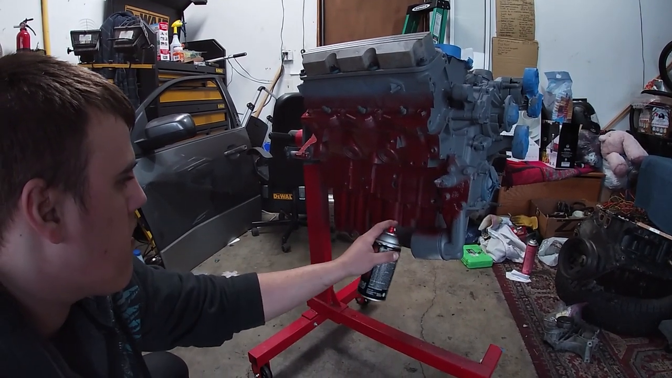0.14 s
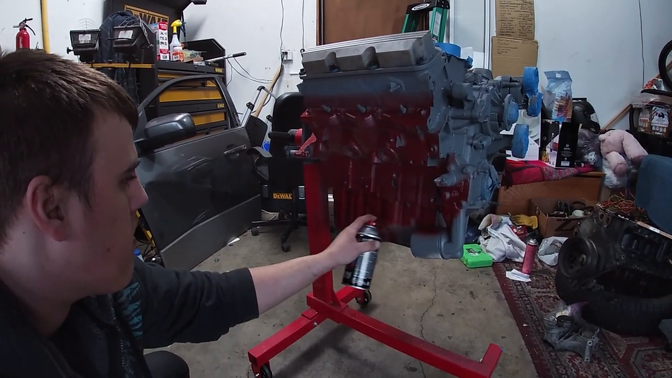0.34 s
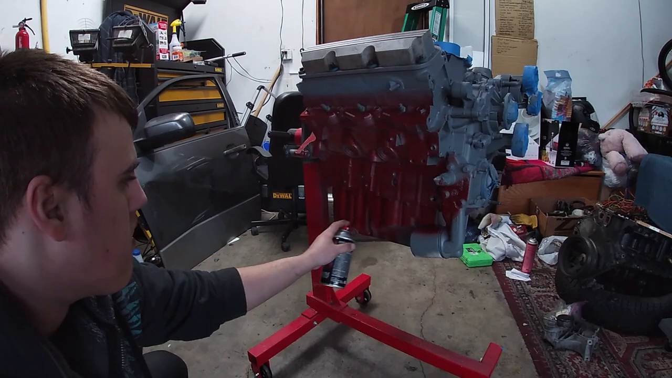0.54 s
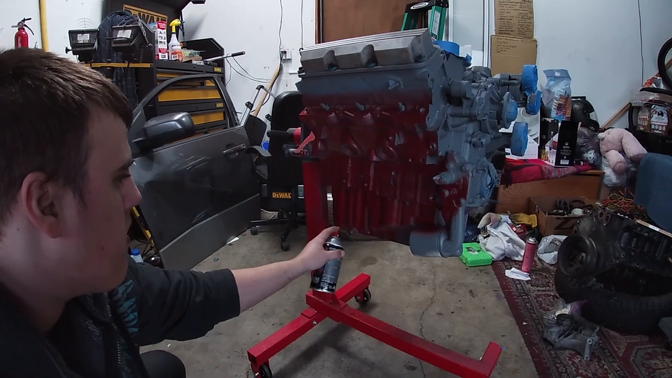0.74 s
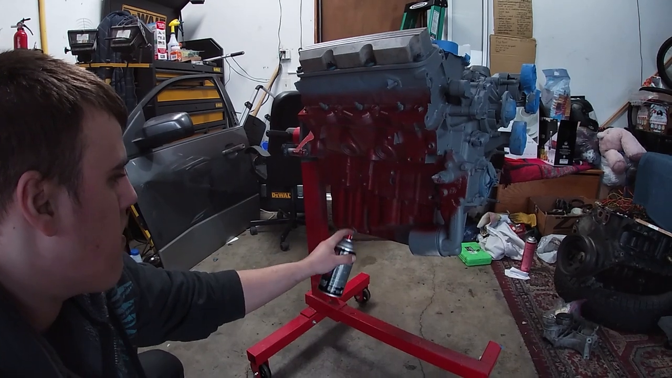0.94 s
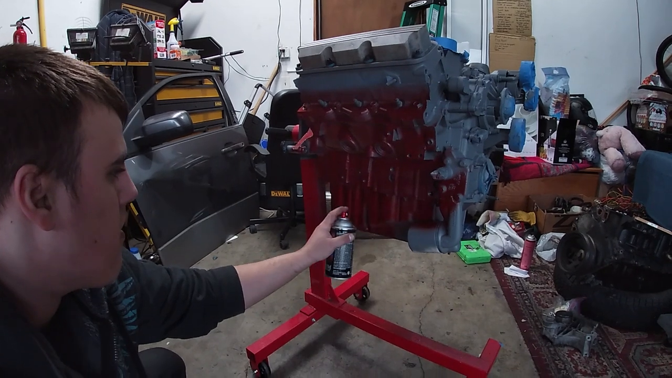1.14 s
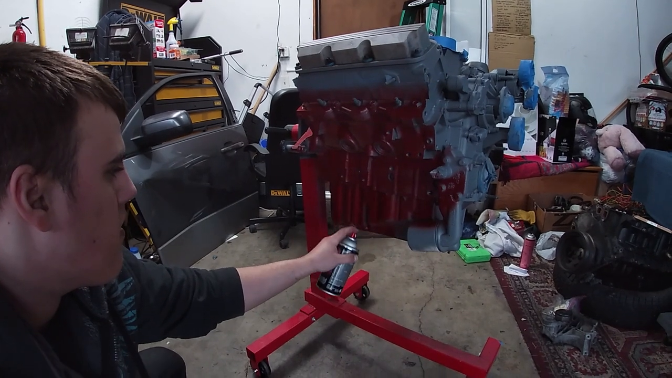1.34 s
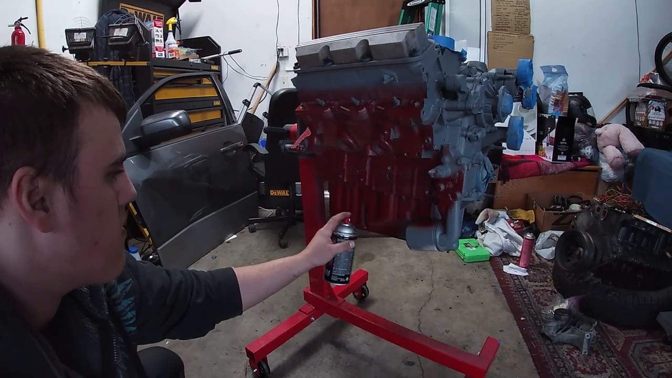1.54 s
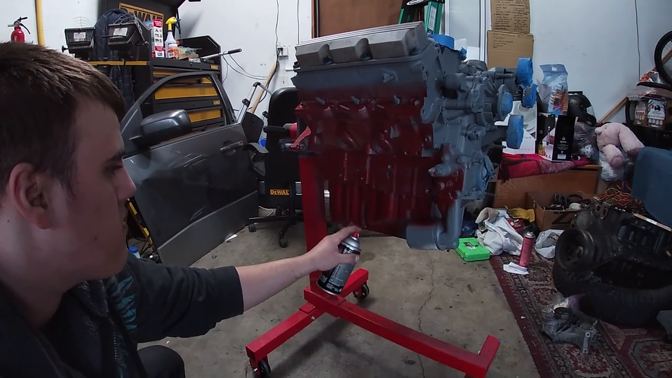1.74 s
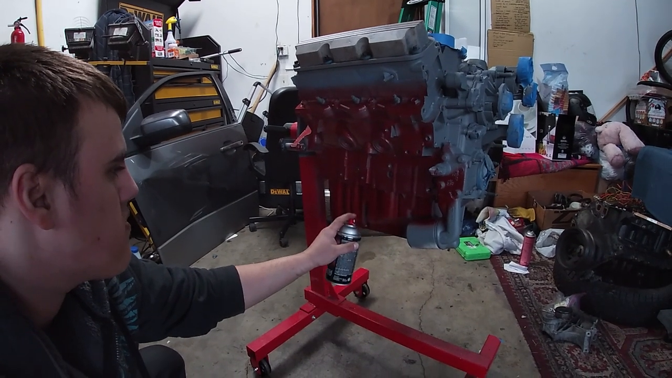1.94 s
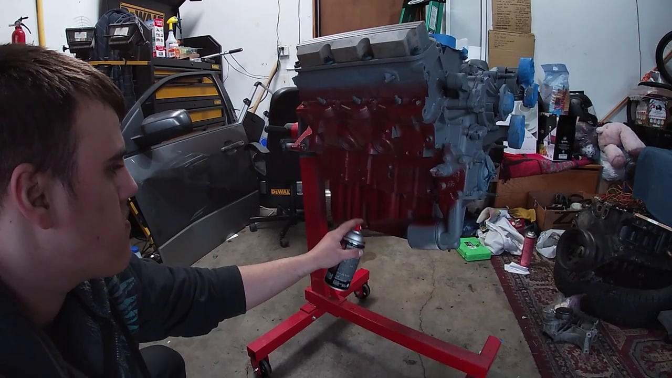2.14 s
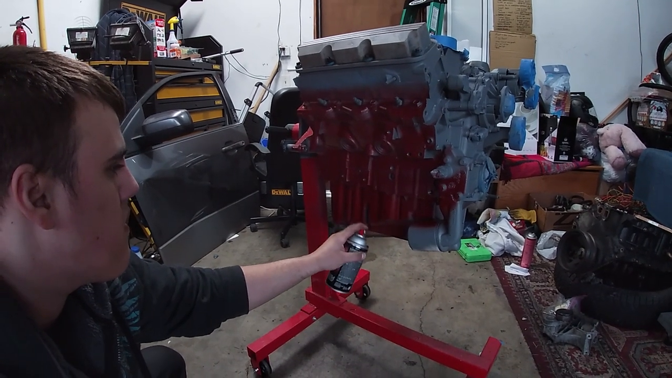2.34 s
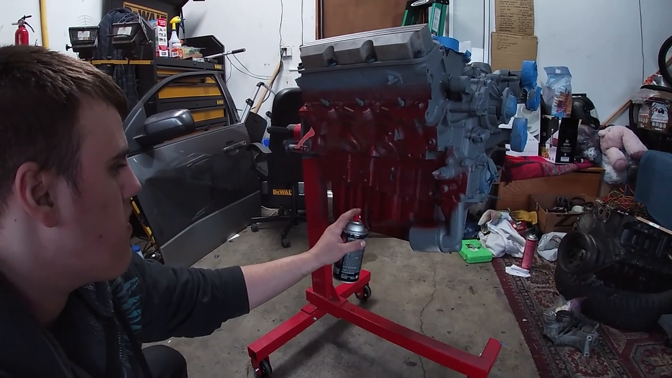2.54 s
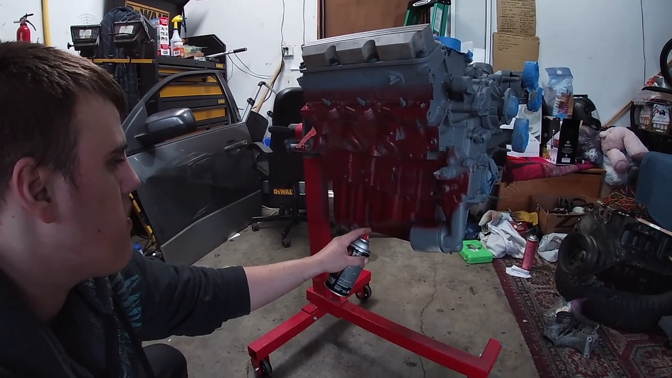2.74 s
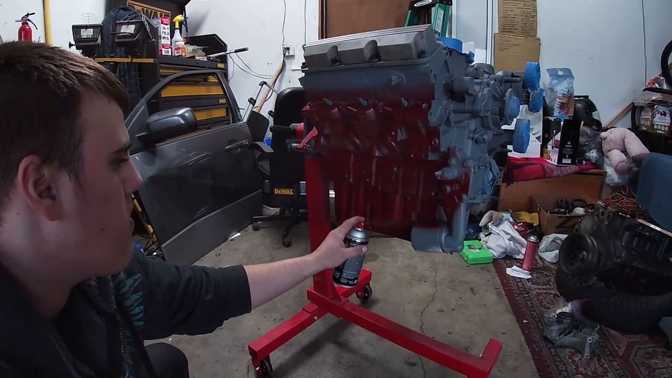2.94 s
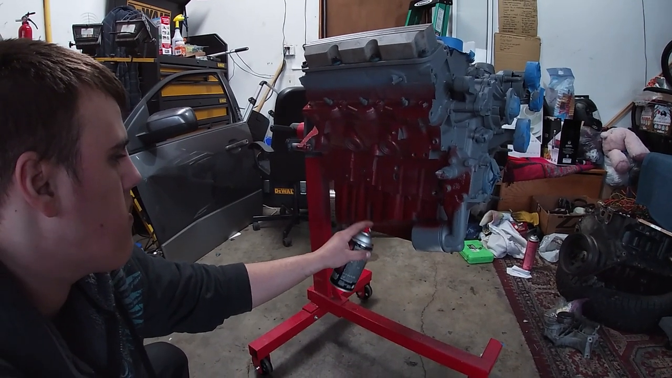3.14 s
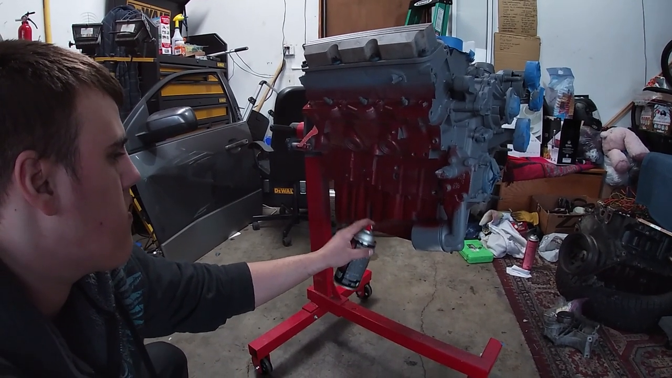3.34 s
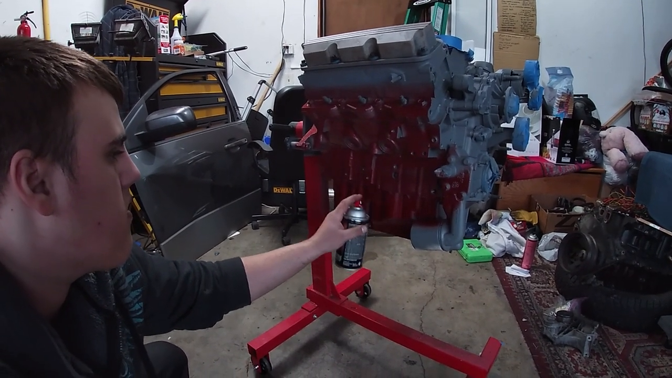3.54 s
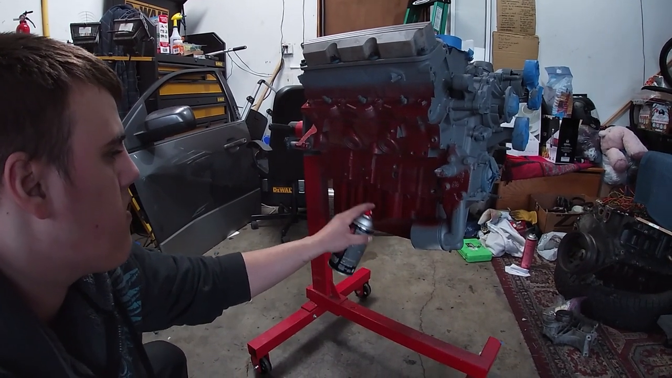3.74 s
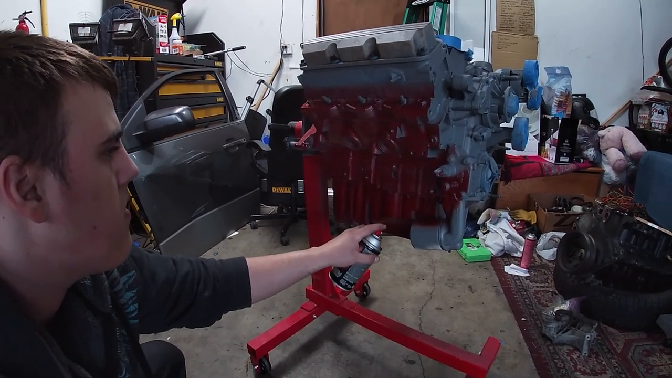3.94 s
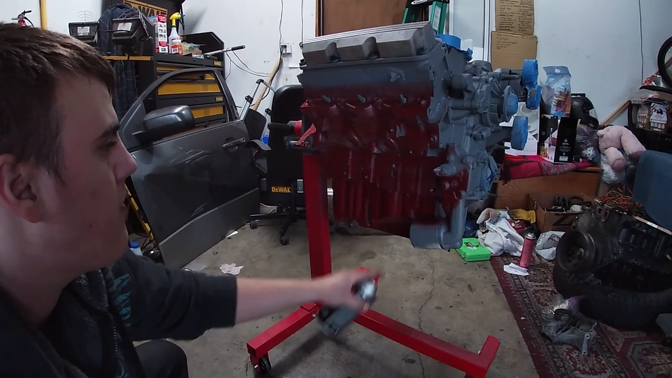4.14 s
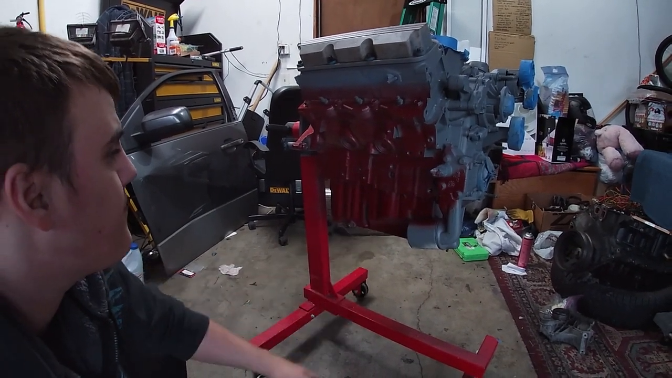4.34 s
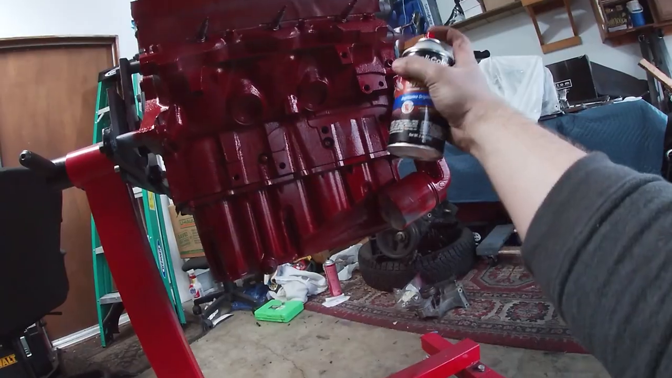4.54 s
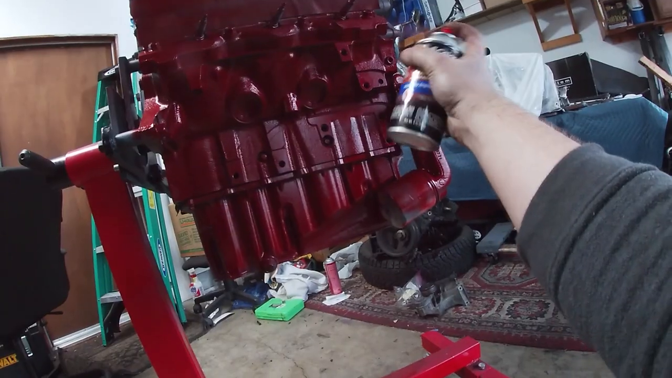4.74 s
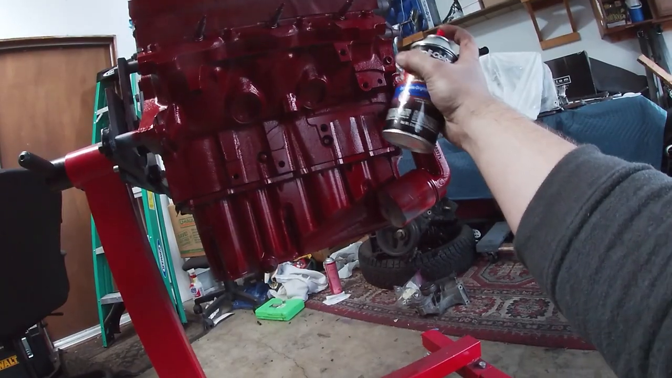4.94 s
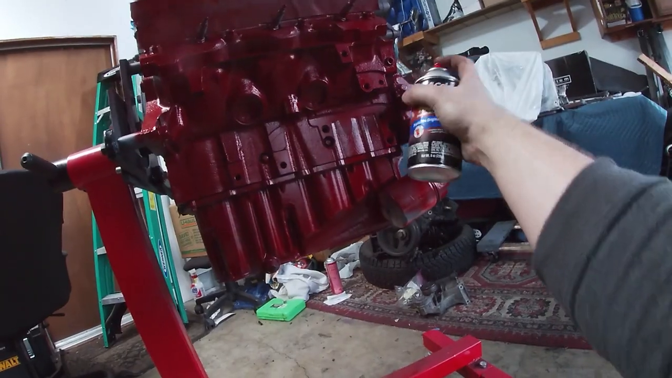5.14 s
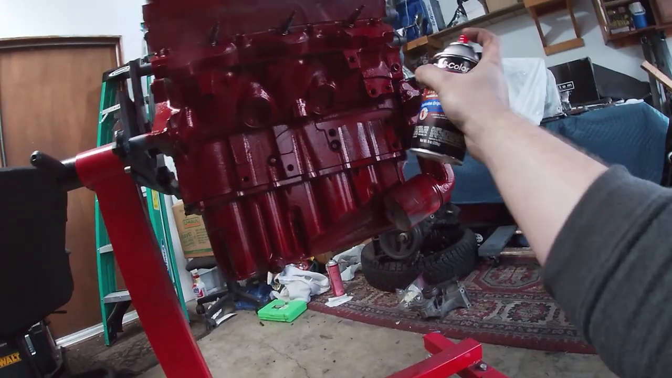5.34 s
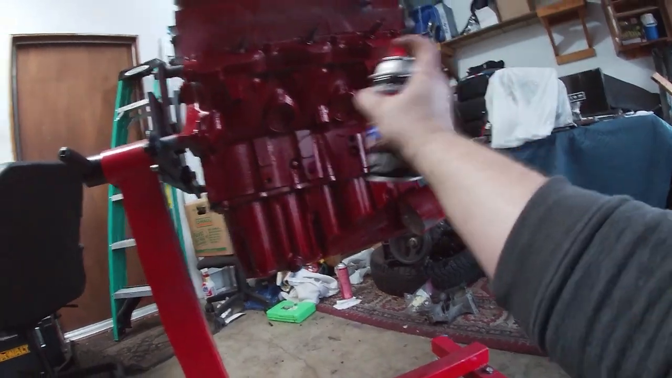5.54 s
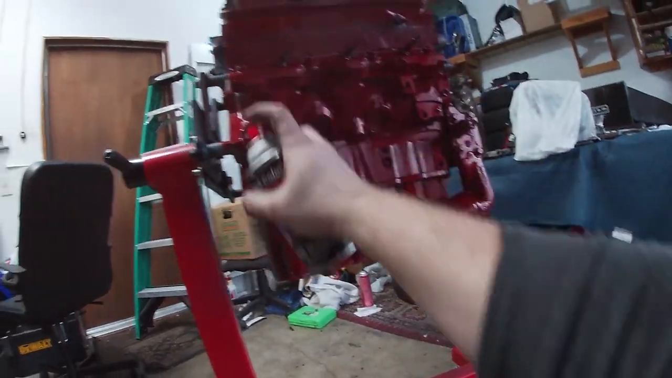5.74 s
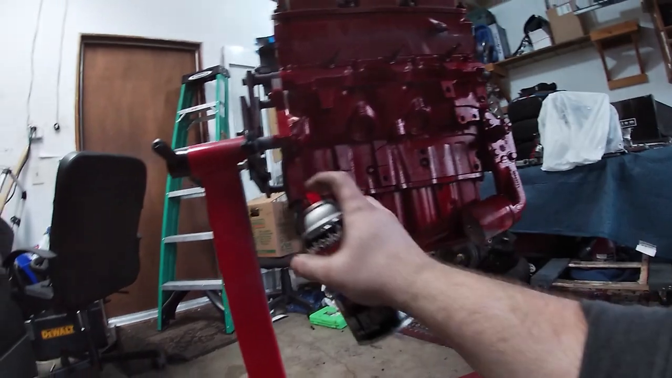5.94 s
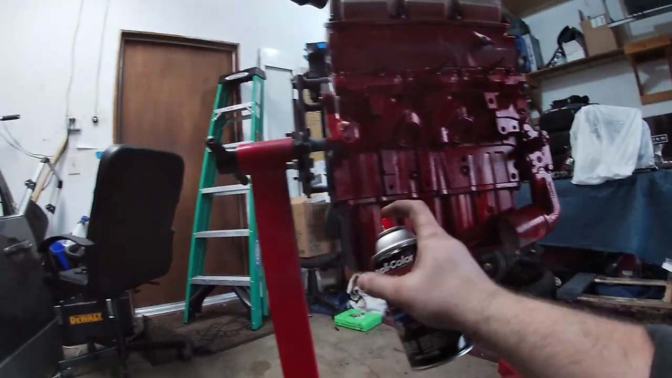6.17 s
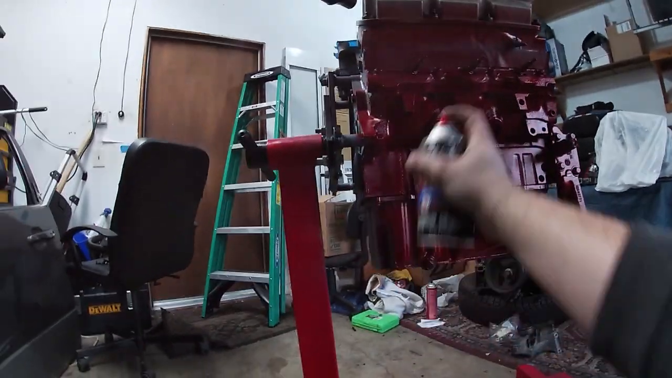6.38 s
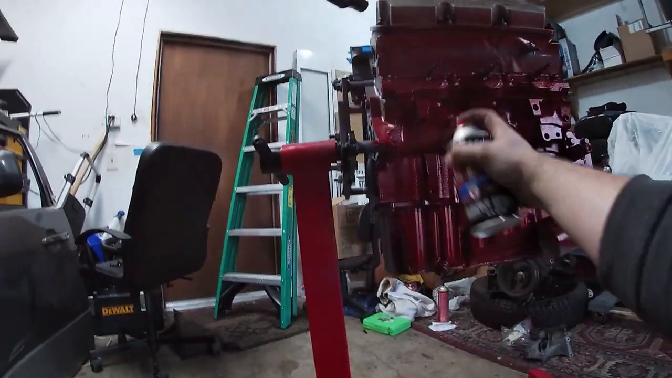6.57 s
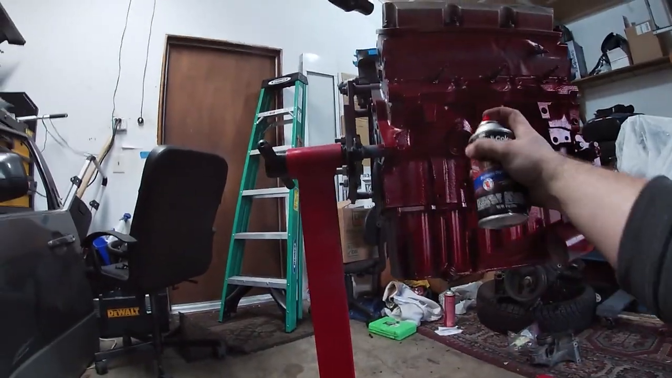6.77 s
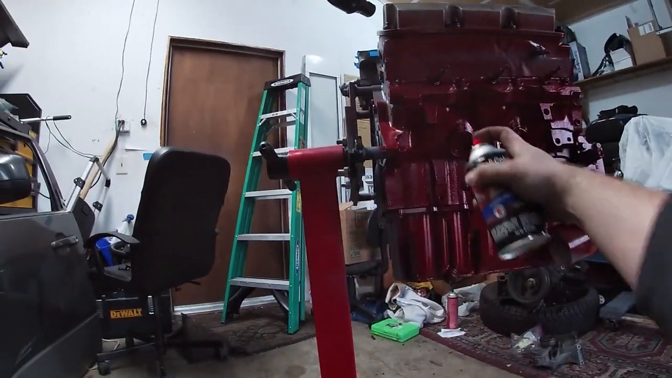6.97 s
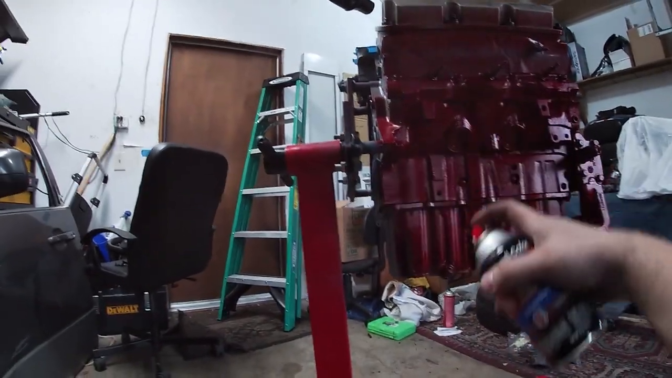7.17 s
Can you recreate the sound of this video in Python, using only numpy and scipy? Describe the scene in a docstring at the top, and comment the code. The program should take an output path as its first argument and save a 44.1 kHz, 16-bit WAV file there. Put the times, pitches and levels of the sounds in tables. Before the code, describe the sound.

In a quiet garage, a paint can gives short, separate hisses, about two a second, against an engine block, heard from the side. Its mixing ball rolls and ticks lightly between spurts. After a pause the spurts return closer and slightly louder, from just behind the can; then the can is shaken in a hard metallic clatter, and two last spurts follow with a few more sharp knocks. Faint room hush underneath.

```python
"""Spray can in a garage

Spurts of paint hiss onto an engine block, heard from the side and then from close behind the can.
The jet is shaped noise gated by the valve and thickened by close, sliding echoes off the block.
The mixing ball rolls in dense ticks and knocks the can's modes into ringing; twice it rattles hard.
Under it lie a garage hush, a low drone, a thin whine in the first part, and soft bumps and scuffs."""
import sys
import numpy as np
from scipy import signal
from scipy.fft import rfft, irfft, next_fast_len
from scipy.io import wavfile
from scipy.ndimage import map_coordinates

SR = 44100
rng = np.random.default_rng(int(sys.argv[2]) if len(sys.argv) > 2 else 0)


def put_to_file(sound):
    """Save the sound as 16-bit audio at rate SR, in the file named by the first command-line argument."""
    columns = np.atleast_2d(sound).T  # one column per channel
    safe = np.clip(columns, -1, 1)
    whole_steps = np.round(safe * 32767)
    wavfile.write(sys.argv[1], SR, whole_steps.astype(np.int16))


N = 317961
TIME = np.arange(N) / SR
BEHIND_FROM_S = 4.35   # heard from the side before this, from behind the can after it
CUTOFF_HZ = 15900
WHINE_HZ, WHINE_DB, WHINE_END_S = 6701, -67, 4.19
RING_SIDE_HZ, RING_BEHIND_HZ = 4570, 3700   # favoured wall ring; the second is for hard blows

# presses of the nozzle: start_s, stop_s, level_db (before swell and mix), swell_db (over the press),
# aim (0 straight, higher = turned so that the hiss is thinner)
SPURTS = [(0, 0.132, -41, -0.5, 0), (0.304, 0.711, -40, 0.5, -0.24), (1.019, 1.237, -40.5, 1, -.2),
          (1.408, 1.635, -40.5, .5, 0.15), (1.865, 2.078, -41, 1, .2), (2.393, 2.58, -40.5, 0, -0.077),
          (2.906, 3.093, -39.5, 1, 0.021), (3.364, 3.603, -39.5, 0, 0.1), (4.483, 4.672, -36.5, 1, -0.36),
          (4.81, 4.99, -38.5, 0, -0.58), (5.106, 5.262, -38, -1.5, 1.5), (5.56, 5.765, -38.5, -0.5, 1.3),
          (6.535, 6.745, -39, -.5, 0.11), (6.867, 7.05, -39.5, -0.5, 0.78)]
# spectrum of the jet from the side and from behind the can: pitch_hz, level_db (per Hz, relative)
JET_SIDE = [(400, -26.5), (1150, -20), (1650, -2.5), (3400, 0), (4700, 1.5), (5500, -1), (6100, -11),
            (6800, -5), (7400, -2), (8000, -14), (9800, -8), (11700, -21), (14300, -21.5), (15800, -32)]
JET_BEHIND = [(450, -25.5), (1000, -12.5), (1800, -5), (2500, -4.5), (3200, 1), (5400, 1), (6150, -7),
              (6900, 0.5), (7900, -10.5), (9900, -11), (11000, -19.5), (12500, -20.5), (14500, -26),
              (15800, -37)]
# lobes of the hiss: pitch_hz, half_width_hz, level_db (aimed straight), turn_db (per unit of aim)
JET_LOBES = [(4750, 720, 0.06, 0), (6730, 580, 2, -3.5), (9000, 680, 1.6, 4)]
# the ball rolls round the can: fastest_s, length_s, level_db (before the speed curve),
# height (0 base to 1 upper wall)
ROLLS = [(0.212, 0.2, -37, 1), (0.655, 0.25, -43, 0.59), (0.788, 0.13, -41.5, .65), (1.003, 0.1, -45.5, .6),
         (1.125, 0.23, -35.5, 1), (1.302, 0.12, -48.5, .55), (1.626, 0.16, -34.5, 1),
         (2.166, 0.28, -49.5, 0.65), (2.83, 0.25, -57, 0.65), (3.978, .1, -57, 0.88),
         (4.496, 0.16, -49.5, 0.35), (4.698, 0.27, -44, 0), (5.135, 0.074, -39, .3),
         (5.422, 0.036, -53, 0.4), (5.537, 0.15, -50, 0.22), (5.807, 0.13, -46.5, 0.5),
         (6.789, 0.048, -42, 0.077), (7.138, 0.27, -45.5, 0.15)]
# the ball strikes the can: start_s, blow_db (before the spot's share),
# spot (0 dome, 1 base, 2 lower wall, 3 upper wall)
KNOCKS = [(0.2193, -40.5, 3), (0.239, -42, 3), (0.762, -42.5, 1.4), (1.1313, -36, 2.3), (1.1438, -36, 2.6),
          (1.652, -46, 2.7), (1.6872, -40, 3), (2.763, -54, 0), (4.304, -50, 1.33), (5.112, -41, 1),
          (5.1245, -32, 1.8), (5.8884, -23, 0.096), (5.8908, -20.5, 0.52), (5.8925, -20.5, 1.96),
          (5.9633, -30, 0.11), (5.98, -20, 1.68), (5.982, -23, 2.3), (5.9883, -26.5, 1.2),
          (6.0158, -24, 1.83), (6.0448, -29.5, 0.78), (6.0481, -22, 1.9), (6.0537, -32, 0.95),
          (6.0772, -29, 2.2), (6.0846, -26, 1), (6.091, -28.5, 1.65), (6.1083, -35, 1), (6.113, -28.5, 2.4),
          (6.131, -30.5, 1.65), (6.143, -32, 2.1), (6.155, -31.5, 1.6), (6.169, -39, 1.4),
          (6.667, -20.5, 1.9), (6.6888, -28.5, 2.4), (6.7121, -23, 2), (6.7396, -26.5, 2.1),
          (7.1279, -41.5, 1.84)]
# modes of the can, damped by the paint: pitch_hz, width_hz, level_db (relative)
DOME_MODES = [(1220, 150, -9), (1380, 100, 7)]
BASE_MODES = [(1670, 200, 2.5), (1904, 138, 7.5), (2070, 115, 6), (2450, 510, -3.5)]
WALL_MODES = [(2950, 320, -4), (3672, 150, 0.5), (3890, 150, 2), (4200, 530, 0), (4430, 250, 2.5),
              (5040, 500, -4.5)]
RIM_MODES = [(6000, 310, -10.5), (6700, 270, -7), (7330, 240, -9.5), (9040, 270, -10), (10180, 350, -8.5),
             (14100, 1000, -19.5)]
# wall modes driven by a rolling contact: pitch_hz, width_hz, level_db (relative)
LOWER_WALL = [(3390, 330, -8), (3610, 200, -5.5), (3960, 63, -4.5)]
UPPER_WALL = [(4130, 270, -9), (4574, 190, -3)]
# what a blow sets ringing, one row each for dome, base, lower and upper wall:
# dome_db, base_db, wall_db, rim_db
SPOTS = [(-7.5, -11, -13.5, -22), (-40, -8.5, -19.5, -28), (-27, -20, -10.5, -25), (-36, -36, -10, -38)]
# reverberation of the garage: pitch_hz, decay_s (to -60 dB)
GARAGE_T60 = [(200, 0.68), (2000, 0.19), (6000, 0.32), (14000, 0.25)]
# bumps and scuffs of body and hands: start_s, level_db (before the envelope), pitch_hz, width_hz, length_s
BUMPS = [(.947, -54.5, 60.6, 70, 0.05), (1.107, -63, 45, 60, .067), (1.261, -57, 115, 199, 0.026),
         (2.53, -64, 380, 350, .09), (2.663, -54.5, 850, 400, .041), (2.764, -50.5, 1700, 2200, 0.046),
         (4.114, -58, 3020, 1500, 0.047), (4.214, -58, 2200, 160, 0.058), (5.705, -43, 254, 298, 0.031),
         (5.746, -51.5, 152, 201, 0.07), (6.353, -60.5, 540, 700, 0.054), (6.632, -44, 885, 900, 0.013),
         (6.657, -58, 40, 45, 0.14), (6.968, -52.5, 176, 148, 0.084)]
# hush of the garage from the side and from behind the can: pitch_hz, level_db (per Hz, relative)
HUSH_SIDE = [(25, 0.5), (100, -7), (165, -3), (230, -2.5), (400, -13), (800, -1.5), (1500, -2),
             (2900, -5.5), (4500, -11.5), (6000, -14), (7300, -13.5), (8300, -24), (9800, -28),
             (12500, -50)]
HUSH_BEHIND = [(25, 4), (100, -6.5), (165, 0), (330, -10.5), (900, -8), (1800, -2.5), (2700, -10),
               (3700, -9.5), (5000, -18), (7200, -17.5), (8300, -28), (9800, -30), (12500, -47)]


def from_db(db):
    """Decibels to gain."""
    return 10 ** (np.asarray(db) / 20)


def rms_one(x):
    """Scale to unit rms."""
    return x / np.sqrt(np.mean(x ** 2) + 1e-20)


def at_hz(points, hz):
    """Read a table along a log-frequency axis."""
    f, value = np.transpose(points)
    return np.interp(np.log(np.maximum(hz, 1)), np.log(f), value)


def coloured(level_db, size):
    """Unit noise whose spectrum in dB is given as a function of Hz."""
    spectrum = rfft(rng.standard_normal(size))
    return rms_one(irfft(spectrum * from_db(level_db(np.fft.rfftfreq(size, 1 / SR))), size))


def drift(rate_hz):
    """Random wander of unit rms, mostly slower than the given rate."""
    size = next_fast_len(N, real=True)
    smoothing = 1 + (np.fft.rfftfreq(size, 1 / SR) / rate_hz) ** 2
    return rms_one(irfft(rfft(rng.standard_normal(size)) / smoothing, size)[:N])


def band_pass(x, low_hz, high_hz):
    """Keep one band of a sound."""
    return signal.sosfilt(signal.butter(2, [low_hz, high_hz], "band", fs=SR, output="sos"), x)


def resonance(x, hz, width_hz):
    """Two-pole resonance with gain 1 on top."""
    r = np.exp(-np.pi * width_hz / SR)
    zeros = np.array([1, 0, -1]) * (1 - r * r) / 2
    poles = [1, -2 * r * np.cos(2 * np.pi * hz / SR), r * r]
    return signal.lfilter(zeros, poles, x + 1e-18)


def double_resonance(x, hz, width_hz):
    """The same resonance twice in a row, for steeper skirts."""
    return resonance(resonance(x, hz, width_hz), hz, width_hz)


def ring(x, modes, skirt=1.2):
    """Modes in parallel with alternating sign; little is radiated outside their range."""
    out = 0
    for k, (hz, width_hz, level_db) in enumerate(modes):
        out = out + (-1) ** k * from_db(level_db) * resonance(x, hz, width_hz)
    return band_pass(out, modes[0][0] / skirt, min(modes[-1][0] * skirt, CUTOFF_HZ))


def add(track, start_s, sound):
    """Mix a sound into a track at a time."""
    at = round(start_s * SR)
    track[at:at + len(sound)] += sound[:N - at]


def spray(open_s=0.0073, shut_s=0.015, spit_db=0.43):
    """Jet noise whose colour turns with the aim; the valve opens fast and closes more softly."""
    out, t = np.zeros(N), TIME[:SR * 3 // 4]
    for start_s, stop_s, level_db, swell_db, aim in SPURTS:
        length_s = stop_s - start_s
        jet = JET_SIDE if start_s < BEHIND_FROM_S else JET_BEHIND

        def colour_db(f):
            level = at_hz(jet, f)
            for hz, half_width_hz, lobe_db, turn_db in JET_LOBES:
                level = level + (lobe_db + aim * turn_db) * np.exp(-((f - hz) / half_width_hz) ** 2)
            return level

        hiss = coloured(colour_db, len(t))
        # at the outset the valve is already open
        opening = 1 - (start_s > open_s) * np.exp(-t / open_s)
        closing = np.exp(-np.maximum(t - length_s, 0) / shut_s)
        swell = swell_db * (np.minimum(t / length_s, 1) - 1.5)
        add(out, start_s, hiss * opening * closing * from_db(level_db + swell))
    # droplets make the flow slightly uneven
    return out * from_db(spit_db * drift(410))


def pockets(x, width_hz=350, depth=0.16, count=10):
    """Narrow parts of the hiss swell and fade as the jet passes ribs and hollows of the casting."""
    centres_hz = np.geomspace(2000, 10500, count)
    return x + depth * sum(drift(5) * resonance(x, hz, width_hz) for hz in centres_hz)


def off_the_block(x, echo, slide_s=0.000177, sweep_hz=1.5):
    """Close echoes off the casting comb the sound and slide as the hand sweeps."""
    out = x
    for lag_s in (.0009, .0019, .0037):
        read_at = np.arange(N) - SR * (lag_s + slide_s * drift(sweep_hz))
        out = out + echo * map_coordinates(x, [read_at], order=3)
    return out


def rolling(ticks_per_s=1000, spread_db=3.5, skip_share=0.037, skip_db=5.0,
            edge_db=11.0, rim_db=-19.5, far_db=-17.0, far_power=1.7):
    """Dense uneven ticks with a few harder skips, louder with speed; the nearest part rings most."""
    push = np.zeros((3, N))   # base, lower wall, upper wall
    for fastest_s, length_s, level_db, height in ROLLS:
        speed = np.bartlett(round(length_s * SR))   # up to the middle and down again
        force = from_db(level_db + edge_db * (speed - 1.5)) * np.minimum(10 * speed, 1)
        for track, part_height in zip(push, (0, .5, 1)):
            distance_db = far_db * abs(height - part_height) ** far_power
            add(track, max(fastest_s - length_s / 2, 0), force * from_db(distance_db))
    uneven_db = spread_db * np.minimum(rng.exponential(1, N), 3.5)
    skips_db = skip_db * (rng.random(N) < skip_share)
    sizes = from_db(uneven_db + skips_db) * rng.choice([-1, 1], N)
    ticks = sizes * (rng.random(N) < ticks_per_s / SR)
    parts = (BASE_MODES, LOWER_WALL, UPPER_WALL, RIM_MODES[:-1])
    base, lower, upper, rim = (rms_one(ring(ticks, modes)) for modes in parts)
    return push[0] * base + push[1] * lower + push[2] * (upper + from_db(rim_db) * rim)


def knocks(thud_db=-25.5, hard_db=-22.5, click_hz=10000, dull_hz_per_db=220,
           favour_db=8.0, favour_width_hz=190, rise_hz_per_db=28.0):
    """Clicks excite modes by spot; lighter blows are duller and, from behind, favour a higher ring."""
    out = np.zeros(N)
    for start_s, blow_db, spot in KNOCKS:
        lighter_db = min(hard_db - blow_db, 12)
        top_hz = np.clip(click_hz - dull_hz_per_db * lighter_db, 2000, CUTOFF_HZ)
        low_pass = signal.butter(2, top_hz, fs=SR, output="sos")
        click = signal.sosfilt(low_pass, signal.unit_impulse(SR // 20))
        # a spot between two rows of the table blends them
        parts_db = [blow_db + np.interp(spot, np.arange(len(SPOTS)), part) for part in np.transpose(SPOTS)]
        behind_hz = RING_BEHIND_HZ + rise_hz_per_db * lighter_db
        strongest_hz = RING_SIDE_HZ if start_s < BEHIND_FROM_S else behind_hz
        for modes, part_db in zip((DOME_MODES, BASE_MODES, WALL_MODES, RIM_MODES), parts_db):
            hz, width_hz, level_db = np.transpose(modes)
            level_db = level_db + favour_db * np.exp(-((hz - strongest_hz) / favour_width_hz) ** 2)
            # sloshing paint shifts the modes' pitch and level a little from blow to blow
            detune, chance_db = rng.normal(size=(2, len(modes))) * [[.012], [2.5]]
            struck = np.transpose([hz * (1 + detune), width_hz, level_db + chance_db])
            tone = rms_one(ring(signal.unit_impulse(len(click)), struck))
            add(out, start_s, from_db(part_db) * signal.fftconvolve(click, tone))
        thud = rms_one(resonance(click, 590, 800))
        add(out, start_s, from_db(parts_db[1] + thud_db) * thud)   # follows the base's share
    return out


def garage(x, build_s=0.0028):
    """Diffuse reflections off clutter and walls, with a decay time for each band."""
    t, tail = TIME[:SR // 2], 0
    edges_hz = np.geomspace(100, CUTOFF_HZ, 9)
    for low_hz, high_hz in zip(edges_hz, edges_hz[1:]):
        band = band_pass(rng.standard_normal(len(t)), low_hz, high_hz)
        decay_s = at_hz(GARAGE_T60, np.sqrt(low_hz * high_hz))
        tail = tail + band * np.exp(-np.log(1000) * t / decay_s)
    tail = tail * (1 - np.exp(-(t / build_s) ** 2))
    return signal.fftconvolve(x, tail / np.linalg.norm(tail))[:N]


def bumps(rise_s=0.0023):
    """Short soft bursts of resonant noise for cloth and handling."""
    out, t = np.zeros(N), TIME[:SR // 2]
    for start_s, level_db, hz, width_hz, length_s in BUMPS:
        rub = rms_one(double_resonance(rng.standard_normal(len(t)), hz, width_hz))
        envelope = (1 - np.exp(-t / rise_s)) * np.exp(-(t / length_s) ** 2)
        add(out, start_s, from_db(level_db) * rub * envelope)
    return out


def background(side_db=-58.0, behind_db=-58.5, drone_hz=160, drone_width_hz=45, drone_db=-75):
    """Steady noise hush, a low room drone and a thin, slightly wavering electrical whine."""
    side = from_db(side_db) * coloured(lambda f: at_hz(HUSH_SIDE, f), N)
    behind = from_db(behind_db) * coloured(lambda f: at_hz(HUSH_BEHIND, f), N)
    hush = np.where(TIME < BEHIND_FROM_S, side, behind)
    rumble = rms_one(double_resonance(rng.standard_normal(N), drone_hz, drone_width_hz))
    drone = from_db(drone_db) * rumble
    whine = rms_one(np.sin(2 * np.pi * np.cumsum(WHINE_HZ + 1.9 * drift(30)) / SR))
    whine_gain = from_db(WHINE_DB + 0.47 * drift(11)) * (TIME < WHINE_END_S)
    return hush + drone + whine * whine_gain


def scene(side_room_db=-8.5, behind_room_db=-13.5, can_room_db=-11.0):
    """Jet and can sound off the block and into the garage; both channels carry the same sound."""
    jet = from_db(-1.8) * off_the_block(pockets(spray()), echo=0.28)
    can = off_the_block(rolling() + knocks(), echo=0.23)
    jet_send = from_db(np.where(TIME < BEHIND_FROM_S, side_room_db, behind_room_db))
    room = garage(jet * jet_send + can * from_db(can_room_db))
    return np.tile(jet + can + room + bumps() + background(), (2, 1))


def record(dry):
    """A steep elliptic low-pass cuts the top."""
    return signal.sosfilt(signal.ellip(10, .1, 80, CUTOFF_HZ, fs=SR, output="sos"), dry)


dry = scene()
out = record(dry)
put_to_file(out)
```